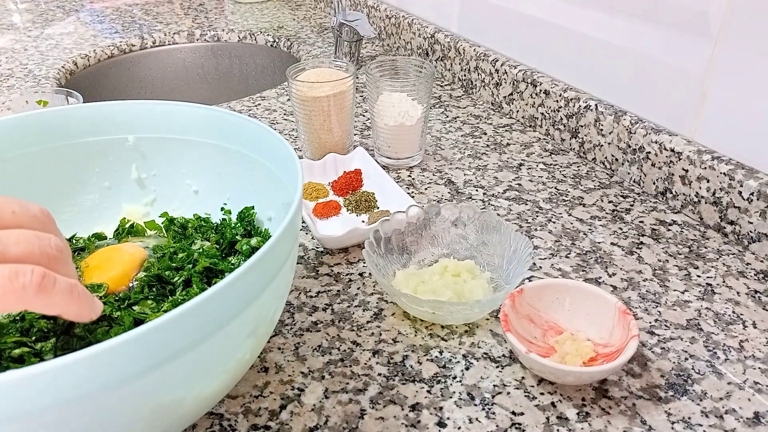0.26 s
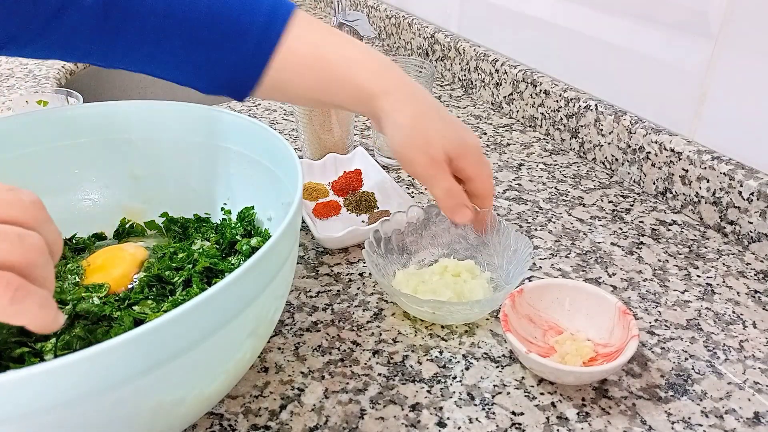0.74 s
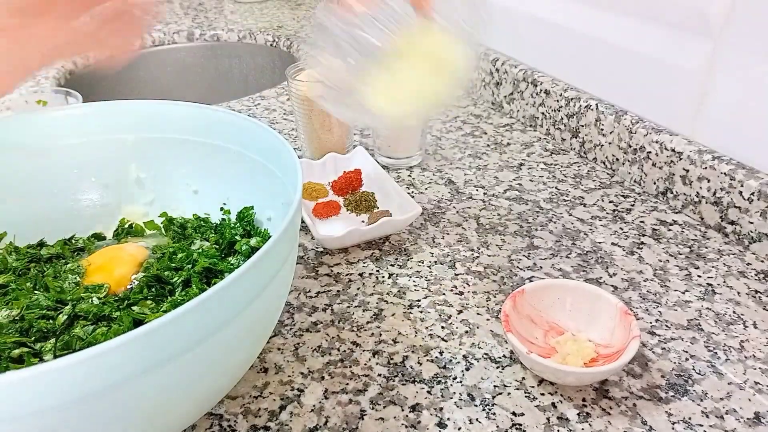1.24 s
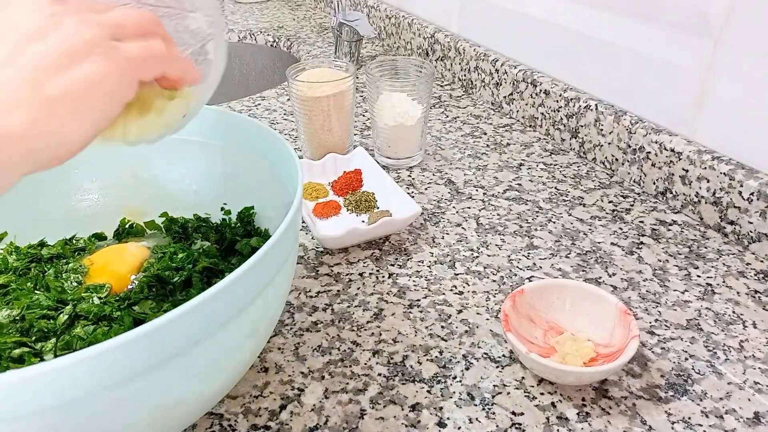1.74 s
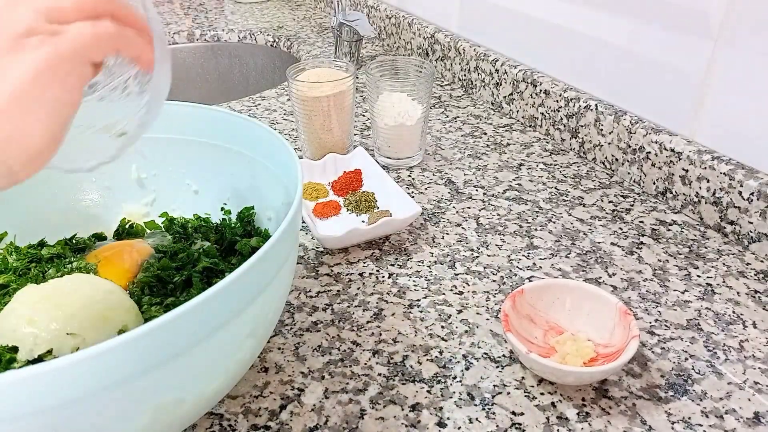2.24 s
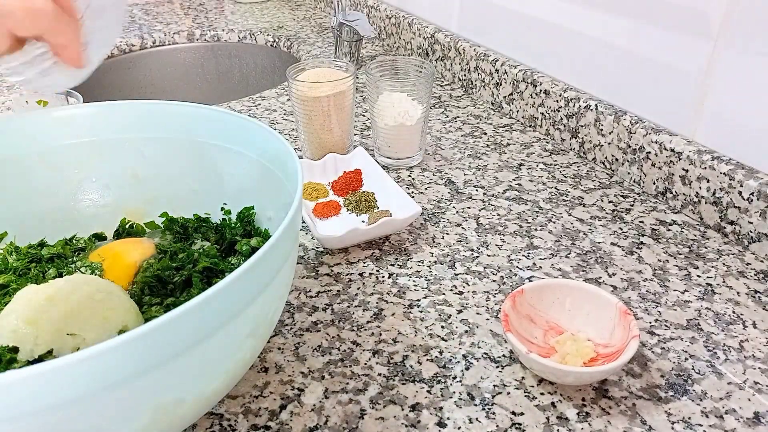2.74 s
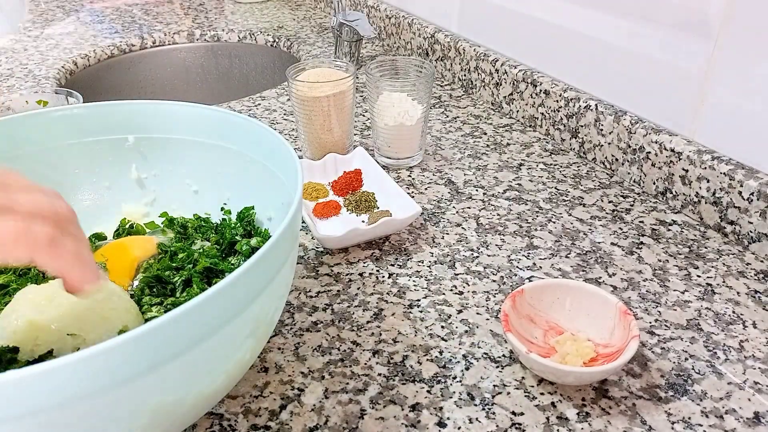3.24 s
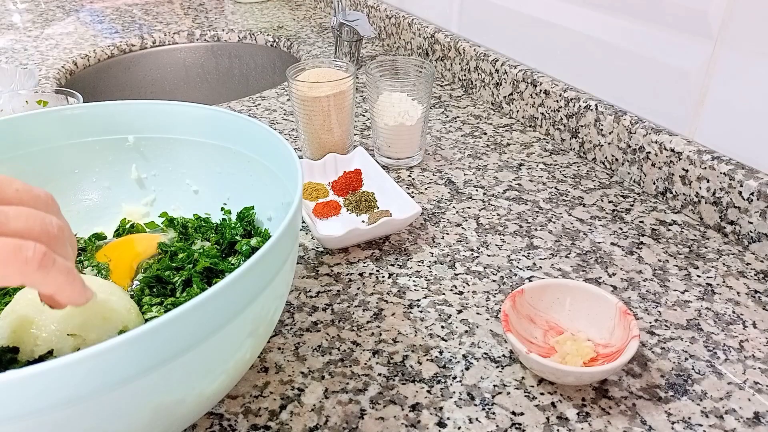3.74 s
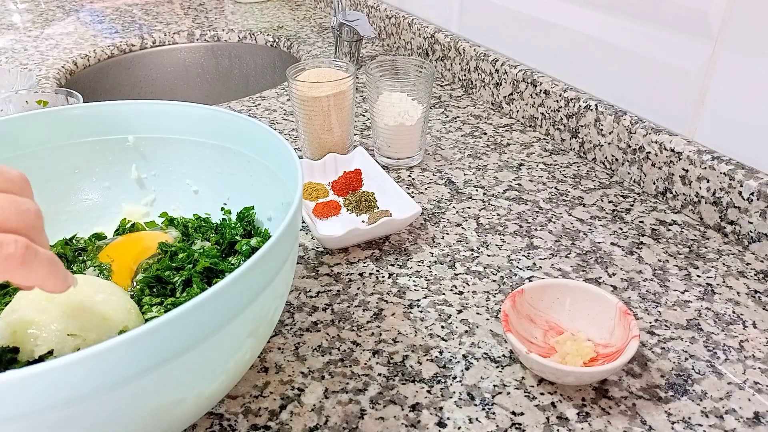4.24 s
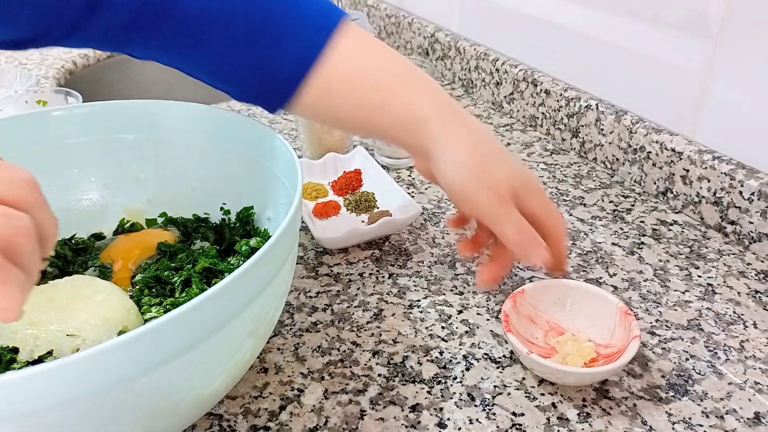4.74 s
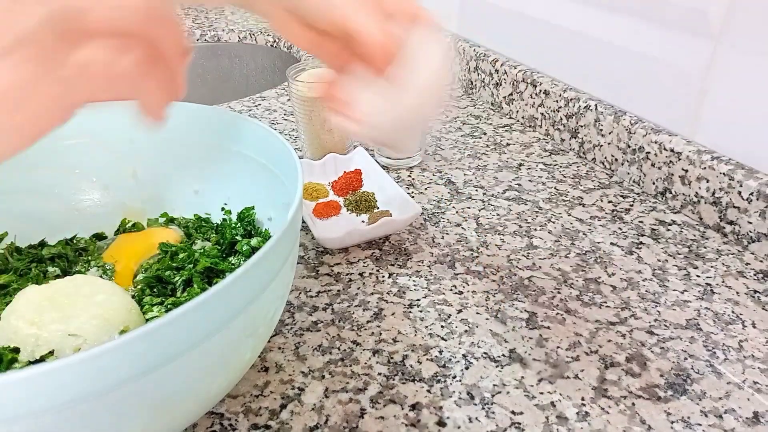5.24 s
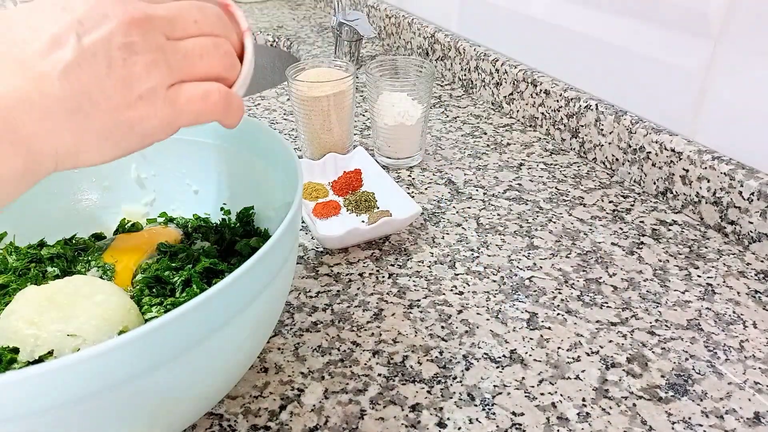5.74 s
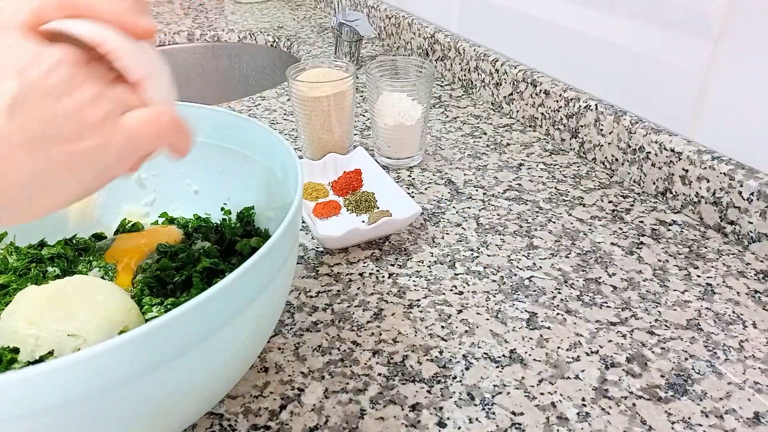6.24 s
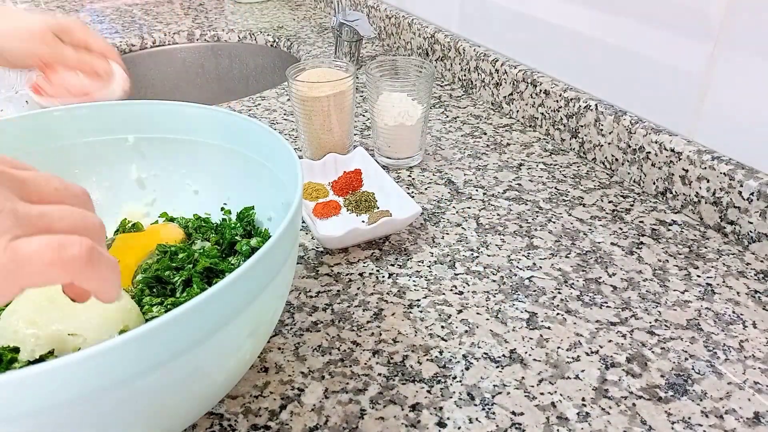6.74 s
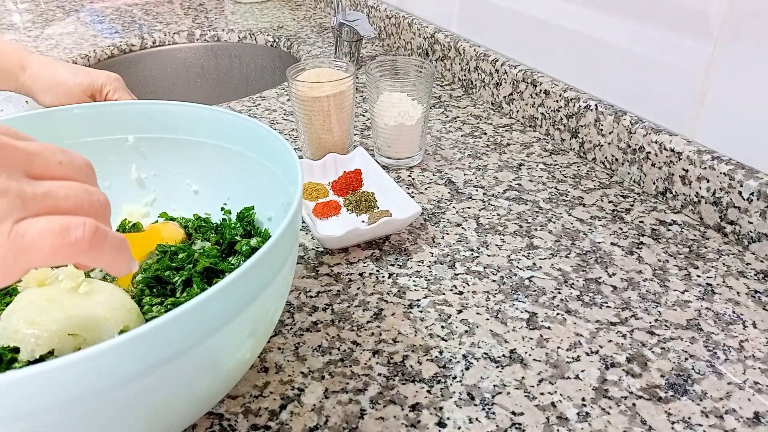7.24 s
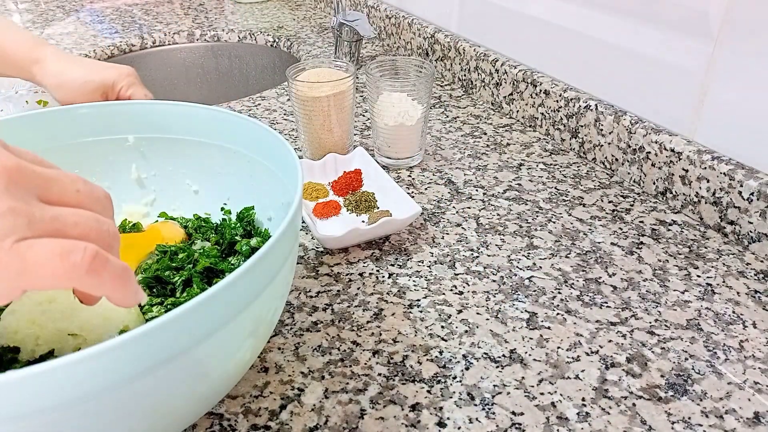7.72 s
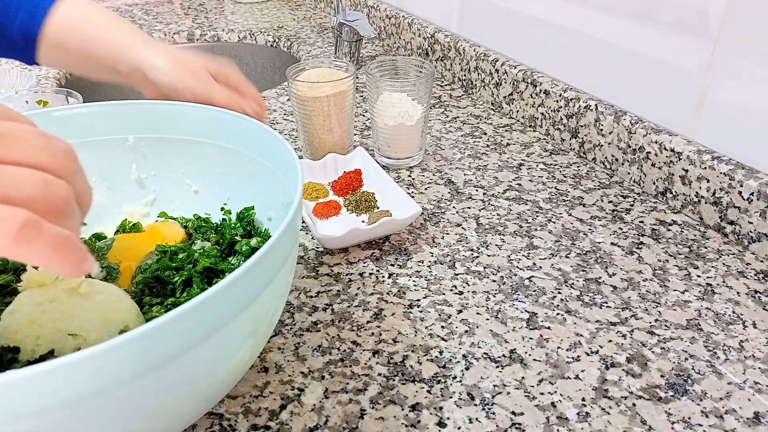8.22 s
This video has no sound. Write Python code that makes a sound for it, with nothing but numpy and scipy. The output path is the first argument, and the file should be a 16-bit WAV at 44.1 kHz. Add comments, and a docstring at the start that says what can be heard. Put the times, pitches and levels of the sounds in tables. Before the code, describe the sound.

Small glass bowls and a china dish knock hard on a stone kitchen counter, with wet grated onion sliding softly between the clacks.

```python
"""Small glass bowls and a china dish knock on a stone counter as they are lifted, emptied and set down again.
Each knock layers a dense clack of filtered noise, a ring of decaying modes, a worktop thud and a hard-walled room.
Harder knocks chatter longer; follow-up contacts rock or land again, and single resonances ping and bump.
Grated onion slides into a plastic mixing bowl in wet pushes of tiny clicks; crumbs tick, thin squeaks glide.
Behind lie hum, hiss, whine and room noise, swelling with an earlier knock's reverb, then with arm movements."""
import sys
import numpy as np
from scipy import signal
from scipy.fft import rfft, irfft, next_fast_len
from scipy.io import wavfile

SR = 44100
rng = np.random.default_rng(int(sys.argv[2]) if len(sys.argv) > 2 else 0)


def waveform_to_disk(signal):
    """Save audio, clipped to [-1, 1], as 16-bit WAV at the path in sys.argv[1]."""
    frames = np.transpose(np.atleast_2d(signal))
    scaled = np.clip(frames, -1, 1) * 32767
    samples = np.round(scaled).astype(np.int16)
    wavfile.write(sys.argv[1], SR, samples)


N = 373968
TIME = np.arange(N) / SR  # seconds through the scene
AGE = np.arange(32768) / SR  # seconds since a blow

# Clack colour of each vessel against the stone: (frequency [Hz], relative level [dB])
CLACK_COLOUR = { "bowl": [(50, -29.5), (100, -17), (250, -20.5), (400, -7), (900, -3.5), (1450, -1),
                (2100, -3), (2800, -2.5), (3800, -13), (5000, -21.5), (7000, -32.5), (8800, -28),
                (11500, -49.5), (15500, -41.5)], "thin bowl": [(50, -25), (100, -20.5), (330, -11),
                (650, -3.5), (950, -8), (1300, 0.5), (1700, 0), (2000, -4.5), (2300, -4), (3000, -8.5),
                (4000, -19.5), (6200, -50), (8300, -21), (11000, -51.5), (13500, -38)], "dish": [(50, -20),
                (100, -15), (250, -11), (420, -3.5), (650, 1.5), (1020, -2.5), (1350, -1.5), (1600, 0.5),
                (1850, 3.5), (2400, -4), (3100, -9), (4000, -18), (5500, -42.5), (9000, -40), (15500, -13)]}
# Ringing modes of each vessel: (frequency [Hz], relative level [dB], t60 [s])
VESSEL_MODES = { "bowl": [(2961, -7, .21), (3128, -8, .5), (3359, -7, .15), (3537, -14, .2), (3671, -6, .5),
                (4000, -15, .24), (4904, -27, .4), (5884, -15, .33), (6051, -22, .2), (8786, -13, .15),
                (12660, -25, .16), (15390, -5, .13), (15600, -16, .13)], "thin bowl": [(1230, -8, 0.38),
                (1550, -34, .3), (2000, -4, 1), (2240, -23, .3), (2490, 6, 0.13), (4170, -3, 0.16),
                (4734, -8, 0.31), (6490, -26, 0.17), (8250, -4, 0.17), (8984, -0.5, 0.1)],
                "held bowl": [(1000, 8, 0.044), (1295, 7, 0.032), (2485, 0, 0.12), (4180, -4.5, 0.12),
                (6420, -4, 0.035), (7940, -10, 0.079), (8670, -6, 0.18), (8860, 4.5, 0.071)],
                "thin bowl foot": [(2320, 8, 0.15), (2460, -4, 0.39), (4240, -11.5, 0.13), (7940, -3, .22),
                (7934, -7, .22), (8600, -22.5, .18), (12710, -17, 0.143), (12720, -23.5, .14),
                (13810, -21.5, .16), (14450, -26.5, .2), (15290, -25, .17)], "rim": [(3240, -4, 0.14),
                (4640, -17, .15), (7170, 3.5, 0.14), (7350, -4, 0.13), (9814, -23.5, .14),
                (13580, -17, .13), (14650, -23, .14)], "dish": [(2140, 2, 0.19), (3256, -5, 0.23),
                (3560, -21, .21), (3670, -12, 0.64), (6000, -24, 0.35), (6080, -18, .22), (8560, -15, 0.3),
                (8810, -1.5, 0.096), (8900, -12, 0.073), (11200, -30, .25), (15500, -13, .14)]}
# Strongest resonances of each vessel pressed on the stone, before the blow's own damping:
# (frequency [Hz], relative level [dB], t60 [s])
BOWL_PRESSED = [(358.6, -11.5, 0.43), (738, -11, 0.16), (1366, -6.5, 0.32), (1400, -7, 0.36),
                (1599, -14.5, 0.41), (1774.4, -5, 0.12), (1935, -10.5, 0.37), (2070, -18, 0.58),
                (2240, -18, 0.39), (2380, -14, 0.29), (2446, -7, 0.14), (2800, -24, 0.58)]
THIN_BOWL_PRESSED = [(703, -14, 0.45), (978, -15.5, 0.55), (1277, -14, 0.47), (1355, -12.5, 0.21),
                     (1477, -11.5, 0.31), (1615, -16, 0.27), (1650, -16, 0.22), (1672, -4, 0.35),
                     (1870, -11, 0.48), (1916, -11, 0.3), (2140, -21, 0.34), (2250, -7.5, 0.34),
                     (2480, -15, 0.2), (2595, -16, 0.19)]
DISH_PRESSED = [(646, -12, 0.54), (750, -27, 0.55), (790, -19.5, 0.2), (955, -13.5, 0.26), (1173, -12, 0.2),
                (1490, -16, 0.23), (1600, -34, 0.44), (1836, -21, 0.28), (1860, -2.5, 0.088),
                (1950, -34, 0.49), (2100, -18, 0.23), (2175, -14.5, 0.38), (2470, -11, 0.14),
                (2640, -25, 0.37)]
PRESSED_MODES = {"bowl": BOWL_PRESSED, "thin bowl": THIN_BOWL_PRESSED, "dish": DISH_PRESSED}
# Crowd of short upper modes woken by a sharp contact: (frequency [Hz], relative level [dB])
SHIMMER_COLOUR = [(1500, -30.5), (3300, 4.5), (4600, 1), (6000, -9), (7000, -10.5), (8900, -3),
                  (11000, -22), (13500, -12), (15500, -8.5)]
# Share of the shimmer in each vessel's ring: vessel name: relative level [dB]
SHIMMER_SHARE = {"bowl": -7.5, "thin bowl": -16, "held bowl": -9.5, "thin bowl foot": -15.5, "rim": -10.5,
                 "dish": -14}
# Low modes of the worktop and the cupboard under it: (frequency [Hz], relative level [dB], t60 [s])
WORKTOP_MODES = [(80.3, -8, 0.76), (110.6, 2.5, 0.44), (140.5, 1.5, 0.37), (180.6, -16.5, 0.2),
                 (258.4, -5, 0.35), (383, -3.5, .35)]
# Decay of the kitchen's reflections: (frequency [Hz], t60 [s])
ROOM_DECAY = [(100, 0.32), (250, .58), (600, 0.5), (1500, 0.42), (4000, 0.33), (10000, 0.34)]
# A vessel meets the counter or its neighbour:
# (time [s], clack name, ring name, clack level [dB], contact cut-off [Hz], ring level [dB])
KNOCKS = [ (-.04, "bowl", "bowl", -19, 3700, -60), (0.0638, "bowl", "rim", -43, 15000, -42.5),
          (.145, "bowl", "rim", -41.5, 9000, -62), (0.2492, "bowl", "bowl", -13.5, 15000, -19),
          (1.003, "thin bowl", "thin bowl", -25.5, 3800, -58.5),
          (1.054, "bowl", "thin bowl", -33.5, 9000, -35.5),
          (3.857, "thin bowl", "thin bowl foot", -14, 12000, -24),
          (4.006, "thin bowl", "thin bowl foot", -23.5, 3200, -35),
          (4.143, "thin bowl", "thin bowl foot", -17, 7990, -23.5),
          (4.9955, "dish", "dish", -29.5, 2150, -69.5), (7.2762, "bowl", "dish", -33, 5010, -32),
          (7.408, "dish", "dish", -21, 2850, -39), (7.686, "dish", "bowl", -28.5, 6050, -44),
          (7.826, "dish", "dish", -19, 4750, -56)]
# Follow-up contacts: a vessel rocks and lands again, or a graze leads into a fuller knock:
# (time [s], clack level [dB])
FOLLOW_UPS = [(.281, -19), (0.3395, -23), (3.904, -18.5), (3.926, -21.5), (4.177, -17), (7.2808, -30),
              (7.86, -29)]
# Fingers tap the held glass bowl: (time [s], clack level [dB], ring level [dB])
FINGER_TAPS = [(1.517, -77, -59), (1.554, -69, -65), (1.651, -70, -61), (1.6804, -49.5, -69),
               (2.31, -60, -78), (2.429, -67, -75), (2.884, -56, -60), (2.9896, -53, -46)]
# Single resonances sounding at a bump, a light touch or a fuller knock of a vessel:
# (time [s], frequency [Hz], level [dB])
SINGLE_RESONANCES = [(.1165, 722, -23.5), (.116, 1273, -27), (0.133, 1283, -20), (0.156, 1318, -23),
                     (.161, 123, -37), (.179, 181, -34.5), (0.236, 1420, -31.5), (.789, 117.8, -45.5),
                     (1.004, 1166, -23), (1.458, 189, -52), (1.211, 339, -44.5), (1.681, 1245, -45.5),
                     (2.212, 7860, -62), (4.996, 404, -35)]
# Pushes of the fingers send wet shreds off the vessel: (peak time [s], rise [s], t60 [s], level [dB])
ONION_PUSHES = [(1.653, 0.0055, 0.28, -50), (1.775, 0.043, 0.31, -58.5), (1.875, 0.013, 0.24, -62),
                (1.965, .01, .15, -63), (2.075, 0.027, .35, -65), (2.259, .04, .2, -75),
                (2.445, 0.016, .25, -70), (2.688, 0.041, 0.11, -64), (2.888, .018, 0.23, -57),
                (6.655, 0.026, 0.16, -72.5)]
# Colour of sliding onion and crumbs: (frequency [Hz], relative level [dB])
SLIDE_COLOUR = [(800, 8), (1400, 6.5), (3500, 9), (5500, -3), (7500, -3), (9000, 8.5), (11000, -11),
                (15500, -12)]
# The two ends of the span holding the last crumbs: (time [s], time [s])
CRUMB_SPAN = (6.2, 5.9)
# Faint gliding squeaks: (time [s], length [s], start frequency [Hz], end frequency [Hz], level [dB])
SQUEAKS = [(2.573, .13, 3150, 3910, -70.5), (2.726, 0.15, 3580, 3010, -73), (3.151, .15, 3830, 3480, -71.5),
           (4.803, 0.24, 3700, 4700, -71.5), (5.139, 0.17, 4450, 4800, -78.5),
           (7.51, 0.077, 5130, 4500, -66), (7.597, .07, 4400, 4900, -72)]
# Swells added to the idle whine: (start time [s], length [s], added level [dB])
WHINE_SWELLS = [(5.103, 0.26, -69.5), (6.723, .41, -66.5)]
# Swells of low noise and rustle: the fading reverb of an earlier knock at first, then arm movements;
# levels ahead of the layer trims: (middle time [s], half length [s], rumble level [dB], rustle level [dB])
NOISE_SWELLS = [(.1, 0.45, -47, -61), (1.327, 0.42, -59, -66), (1.849, 0.32, -61.5, -69.5),
                (2.6, 0.48, -67, -68), (3.07, 0.26, -60.5, -65.5), (3.69, 0.11, -57.5, -71),
                (4.3, .12, -57, -74), (5.032, 0.25, -56.5, -60.5), (6, 0.34, -58, -70),
                (6.915, 0.074, -61, -76.5), (7.697, 0.32, -57, -58)]
# Colours of room tone, swelling rumble, rustle and hiss: (frequency [Hz], relative level [dB])
ROOM_TONE_COLOUR = [(25, -8.5), (50, -6.5), (87, -3), (134, -9), (156, -15.5), (186, 0.5), (217, -18),
                    (247, -11.5), (339, -9.5), (500, -25), (900, -40), (2000, -64.5)]
RUMBLE_COLOUR = [(25, -1.5), (45, -0.5), (80, -4.5), (130, -1.5), (152, -10), (184, 0.5), (217, -13),
                 (250, -2.5), (280, -7.5), (325, 6.5), (413, -12.5), (800, -21), (2000, -59.5)]
RUSTLE_COLOUR = [(250, -25), (500, -1), (900, -5.5), (1400, -7), (1800, -9), (2800, -10), (3800, -15.5),
                 (6000, -21)]
HISS_COLOUR = [(3000, -7.5), (4500, -7), (6500, -13), (8000, -2), (9000, 7), (10500, -13), (13000, -10.5),
               (15500, -9.5)]

# Blow force is 1 at FIRM_DB; growth is per unit of force
FIRM_DB, FORCE_POWER = -16, 0.28
CHATTER_T60_S, CHATTER_GROWTH_S = 0.052, 0.11
ROOM_DB, ROOM_GROWTH_DB = -13, 11
PRESSED_DB, PRESSED_GROWTH_DB = -13, 7  # relative to the clack
THUD_DB, THUD_SLOPE = -31, 1.7  # worktop gain at FIRM_DB; dB per dB of clack
FOLLOW_UP_HZ, FOLLOW_UP_RING_DB = 3970, -27  # contact cut-off; ring relative to the clack
TAP_HZ = 14000  # contact cut-off of a fingernail
RESONANCE_T60_S, RESONANCE_DAMPING = 0.2, 0.45  # t60 at 1 kHz; power by which it shortens with pitch
STILL_TONE_DB, STILL_RUSTLE_DB = -63.5, -70.5  # between the swells; the rustle is ahead of its trim
WHINE_HZ, WHINE_FADE_S, WHINE_IDLE_DB = 1350, 0.045, -80.5
TOP_HZ = 16100  # upper edge of the phone's band


def undb(db):
    """Decibels to gain."""
    return 10 ** (np.asarray(db) / 20)


def unit(x):
    """Scale to rms 1."""
    return x / np.sqrt(np.mean(x ** 2))


def onset_unit(x, size=880):
    """Scale so that the first 20 ms have rms 1."""
    return x / np.sqrt(np.mean(x[:size] ** 2))


def fade(t60):
    """Exponential decay after a blow, down 60 dB at t60 seconds."""
    return undb(-60 * AGE / t60)


def swell(rise_s):
    """A vibration takes a moment to spread through a body."""
    return 1 - np.exp(-AGE / rise_s)


def hump(s, half_s):
    """A bell-shaped swell around s seconds, down to 1/e at half_s either side."""
    return np.exp(-np.minimum(((TIME - s) / half_s) ** 2, 60))


def add(track, s, sound):
    """Mix a sound in at s seconds, trimming what falls outside the track."""
    start = int(s * SR)
    part = sound[max(-start, 0):N - start]
    track[max(start, 0):max(start, 0) + len(part)] += part


def colour(x, points, cut_hz=np.inf):
    """Causal minimum-phase filter through (Hz, dB) points, falling steeply above cut_hz."""
    size = next_fast_len(len(x), True)
    f = np.fft.rfftfreq(size, 1 / SR) + 1
    hz, db = np.transpose(points)
    gain = undb(np.interp(np.log(f), np.log(hz), db))
    gain = gain / np.sqrt(1 + (f / cut_hz) ** 6)
    # Folding the cepstrum forward makes the filter causal
    cepstrum = irfft(np.log(gain), size)
    cepstrum[1:size // 2] *= 2
    cepstrum[size // 2 + 1:] = 0
    response = np.exp(rfft(cepstrum))
    return irfft(rfft(x, size) * response, size)[:len(x)]


def ripple(x, depth_db, spacing_hz):
    """Dense, uneven resonances: some narrow bands stand out, others sink."""
    f = np.fft.rfftfreq(len(x), 1 / SR)[::8]
    heights = np.clip(rng.standard_normal(2048), -2, 2)
    bumps_db = depth_db * np.interp(f / spacing_hz, np.arange(len(heights)), heights)
    return colour(x, np.column_stack([f + 1, bumps_db]))


def ring(modes, waver=0.3, waver_hz=70, longest_s=1.0, knee_hz=6000):
    """Decaying modes; reflections from the walls make each one waver, the high ones more and faster."""
    out = np.zeros(len(AGE))
    for hz, db, t60 in modes:
        t60 = min(t60, longest_s)
        t = AGE[AGE < 1.3 * t60]
        blur = np.hypot(1, hz / knee_hz)
        drift = rng.standard_normal(256) + 1j * rng.standard_normal(256)
        drift[0] = 0  # the mode starts clean
        echo = blur * np.interp(t * waver_hz * blur, np.arange(len(drift)), drift)
        mode = np.exp((2j * np.pi * hz - np.log(1000) / t60) * t)
        out[:len(t)] += undb(db) * np.imag((1 + waver * echo) * mode)
    return out


def room_tail(build_s=0.0018):
    """Diffuse reflections build up quickly, then each band of noise decays at its own rate."""
    hz, t60s = np.transpose(ROOM_DECAY)
    noise = rfft(rng.standard_normal(len(AGE)))
    log_f = np.log(np.fft.rfftfreq(len(AGE), 1 / SR) + 1)
    tail = np.zeros(len(AGE))
    for share, t60 in zip(np.eye(len(hz)), t60s):
        band = irfft(noise * np.interp(log_f, np.log(hz), share))
        tail += band * fade(t60)
    return tail * swell(build_s)


def kitchen(rumble_db=2, rustle_db=1, rustle_top_hz=4200, hiss_db=-90, swell_hiss_db=-17,
            hum_hz=187, hum_db=-67, hum_q=25):
    """Low room noise with a hum and a thin hiss; an earlier knock's reverb, then arm movements, swell it."""
    # Overlapping swells add in power
    rumble_power = sum((undb(db) * hump(s, half_s)) ** 2 for s, half_s, db, _ in NOISE_SWELLS)
    rustle_power = sum((undb(db) * hump(s, half_s)) ** 2 for s, half_s, _, db in NOISE_SWELLS)
    still = undb(STILL_TONE_DB) * unit(colour(rng.standard_normal(N), ROOM_TONE_COLOUR))
    rumble = unit(colour(rng.standard_normal(N), RUMBLE_COLOUR)) * np.sqrt(rumble_power)
    rustle = unit(colour(rng.standard_normal(N), RUSTLE_COLOUR, rustle_top_hz))
    rustle = rustle * np.sqrt(undb(STILL_RUSTLE_DB) ** 2 + rustle_power)
    hum = unit(signal.lfilter(*signal.iirpeak(hum_hz, hum_q, fs=SR), rng.standard_normal(N)))
    hiss_level = np.hypot(undb(hiss_db), undb(swell_hiss_db) * np.sqrt(rustle_power))
    hiss = unit(colour(rng.standard_normal(N), HISS_COLOUR)) * hiss_level
    return still + undb(rumble_db) * rumble + undb(rustle_db) * rustle + undb(hum_db) * hum + hiss


def whine():
    """A faint sine of fixed pitch that fades up, holds and fades back to its idle level."""
    level = undb(WHINE_IDLE_DB)
    for s, length, db in WHINE_SWELLS:
        to_edge = np.minimum(TIME - s, s + length - TIME)
        level = level + undb(db) * np.clip(to_edge / WHINE_FADE_S, 0, 1)
    return level * np.sin(2 * np.pi * WHINE_HZ * TIME)


def squeaks(wobble=0.012, arch=0.05, rough=0.91, rough_hz=130, upper_ratio=2.0, upper_db=-13, count=12):
    """Thin, rough whistles that arch in and out, each with a fainter strand about an octave above."""
    out = np.zeros(N)
    for s, length, start_hz, end_hz, db in SQUEAKS:
        u = np.linspace(0, 1, int(length * SR))
        arc = np.sin(np.pi * u)
        for ratio, strand_db in ((1, 0), (upper_ratio, upper_db)):
            drift = np.interp(u, np.linspace(0, 1, count), rng.standard_normal(count))
            glide = start_hz + (end_hz - start_hz) * u
            hz = ratio * glide * (1 + arch * arc + wobble * drift)
            grain = rng.standard_normal(128)
            flutter = 1 + rough * np.interp(u * length * rough_hz, np.arange(len(grain)), grain)
            whistle = np.sin(2 * np.pi * np.cumsum(hz) / SR)
            add(out, s, undb(db + strand_db) * flutter * arc * whistle)
    return out


def crumbs(db=-77, scatter_db=3, t60=0.025, count=7):
    """Sparse, faint ticks of decaying noise as fingers clear the china dish."""
    out = np.zeros(N)
    places = (np.arange(count) + rng.random(count)) / count
    for place, size in zip(places, rng.standard_normal(count)):
        tick = onset_unit(colour(rng.standard_normal(len(AGE)) * fade(t60), SLIDE_COLOUR))
        add(out, np.interp(place, [0, 1], CRUMB_SPAN), undb(db + scatter_db * size) * tick)
    return out


def onion(rate=900, spread_db=3.5, smear=0.42):
    """Wet shreds let go in a stream of tiny clicks that swells with each push and dies away."""
    lets_go = rng.random(N) < rate / SR  # rate in clicks per second
    sizes = undb(spread_db * np.minimum(rng.exponential(size=N), 5))
    clicks = lets_go * rng.choice([-1, 1], N) * sizes
    crackle = unit(colour(unit(clicks) + smear * rng.standard_normal(N), SLIDE_COLOUR))
    flow = np.zeros(N)
    for s, rise_s, t60, db in ONION_PUSHES:
        decay = np.exp(-np.log(1000) * np.abs(TIME - s) / t60)
        flow += undb(db) * np.where(TIME < s, hump(s, rise_s), decay)
    return crackle * flow


def single_resonances(grit_db=-11, width=0.25):
    """Hollow bumps and pings, each one mode with a skirt of noise around its pitch; low ones ring longer."""
    out = np.zeros(N)
    for s, hz, db in SINGLE_RESONANCES:
        t60 = RESONANCE_T60_S / (hz / 1000) ** RESONANCE_DAMPING
        skirt_colour = [(hz / 4, -35), (hz / (1 + width), -9), (hz, 0),
                        (hz * (1 + width), -12), (hz * 4, -45), (hz * 20, -90)]
        skirt = unit(colour(rng.standard_normal(len(AGE)), skirt_colour))
        tone = ring([(hz, 0, t60)], waver=0.4, waver_hz=160)
        sound = tone + undb(grit_db) * skirt * fade(t60)
        add(out, s, undb(db) * sound * swell(0.00033))
    return out


def shimmer(t60=0.046, tail_db=-14, tail_t60=0.42, depth_db=6, spacing_hz=110):
    """Bright, quickly fading jangle of the upper modes, with a faint tail from the tiled walls."""
    shape = (fade(t60) + undb(tail_db) * fade(tail_t60)) * swell(0.00053)
    burst = rng.standard_normal(len(AGE)) * shape
    return onset_unit(colour(ripple(burst, depth_db, spacing_hz), SHIMMER_COLOUR))


def clack(points, contact_hz, t60, room_db, crack=1.0, crack_t60=0.02, spacing_hz=55):
    """A crack and a crowd of short modes, then the room; a softer contact is duller."""
    shape = (fade(t60) + crack * fade(crack_t60)) * swell(0.00059)
    burst = rng.standard_normal(len(AGE)) * shape + undb(room_db) * room_tail()
    burst = ripple(burst, 3.2, spacing_hz)
    return onset_unit(colour(burst, points, contact_hz))


def strike(body, vessel, db, contact_hz, ring_db, graze_db=-21, graze_s=0.003):
    """An edge grazes, the vessel clacks and rings, the heavy worktop builds slower: (delay [s], sound) parts."""
    force = undb(db - FIRM_DB) ** FORCE_POWER
    t60 = CHATTER_T60_S + CHATTER_GROWTH_S * force
    blow = undb(db) * clack(CLACK_COLOUR[body], contact_hz, t60, ROOM_DB + ROOM_GROWTH_DB * force)

    pressed = ring(PRESSED_MODES[body], waver=0.45, waver_hz=60, longest_s=0.69)
    pressed = onset_unit(pressed * swell(0.002) * fade(6 * t60))
    pressed = undb(db + PRESSED_DB + PRESSED_GROWTH_DB * force) * pressed

    chime = ring(VESSEL_MODES[vessel], waver=0.2, waver_hz=109) * swell(0.0007)
    chime = undb(ring_db) * (chime + undb(SHIMMER_SHARE[vessel]) * shimmer())

    thud = ring(WORKTOP_MODES, waver=0.18, waver_hz=20) * swell(0.005)
    thud = undb(THUD_DB + THUD_SLOPE * (db - FIRM_DB)) * thud

    graze = undb(graze_db) * blow * fade(0.011)
    return [(-graze_s, graze), (0, blow + pressed + chime + thud)]


def knocks():
    """Vessels meeting the counter and each other, follow-up contacts, and finger taps on the held bowl."""
    blows = list(KNOCKS)
    for s, db in FOLLOW_UPS:
        # A follow-up takes the clack and ring of the latest knock
        body, vessel = [row[1:3] for row in KNOCKS if row[0] < s][-1]
        blows.append((s, body, vessel, db, FOLLOW_UP_HZ, db + FOLLOW_UP_RING_DB))
    for s, db, ring_db in FINGER_TAPS:
        blows.append((s, "bowl", "held bowl", db, TAP_HZ, ring_db))
    out = np.zeros(N)
    for s, *blow in blows:
        for delay, sound in strike(*blow):
            add(out, s + delay, sound)
    return out


def scene():
    """Every layer summed to one channel, as at one microphone above the counter."""
    background = kitchen() + whine()
    details = squeaks() + crumbs() + onion()
    vessels = single_resonances() + knocks()
    return (background + details + vessels)[None]


def record(dry, bass_hz=70):
    """The phone thins the deep bass, rounds the highest peaks and cuts the top."""
    bass_cut = signal.butter(4, bass_hz, "high", fs=SR, output="sos")
    thin = signal.sosfilt(bass_cut, dry)
    rounded = 1.3 * np.tanh(thin / 1.3)
    top_cut = signal.ellip(10, 0.2, 80, TOP_HZ, fs=SR, output="sos")
    return signal.sosfilt(top_cut, rounded)


dry = scene()
out = record(dry)
waveform_to_disk(out)
```